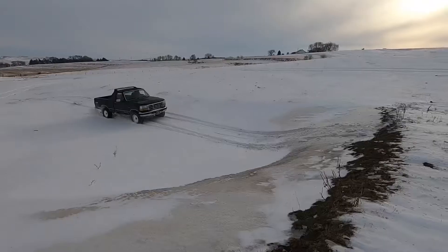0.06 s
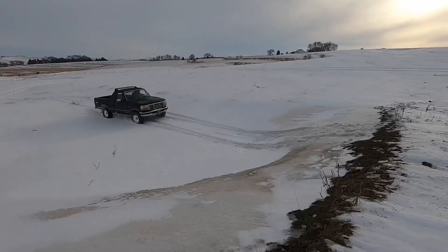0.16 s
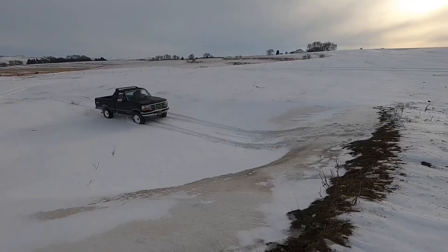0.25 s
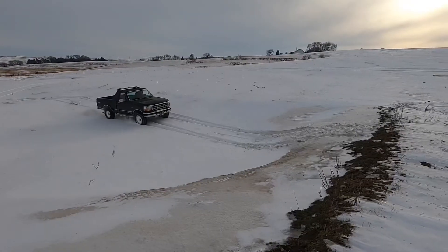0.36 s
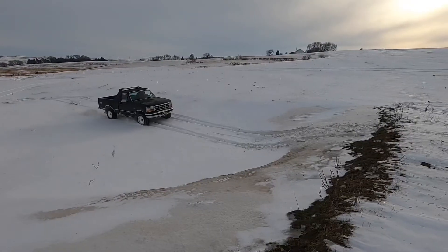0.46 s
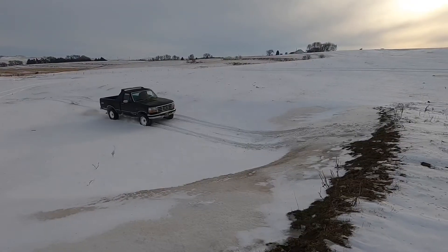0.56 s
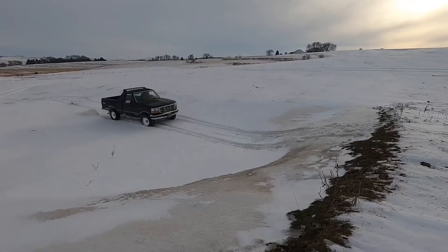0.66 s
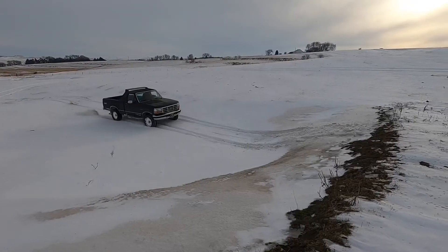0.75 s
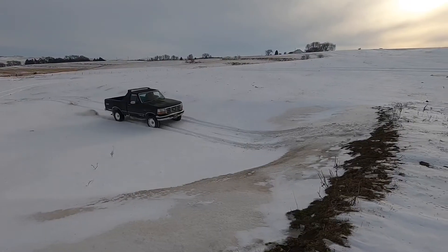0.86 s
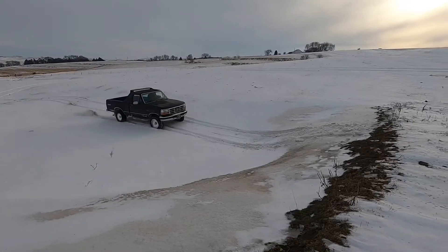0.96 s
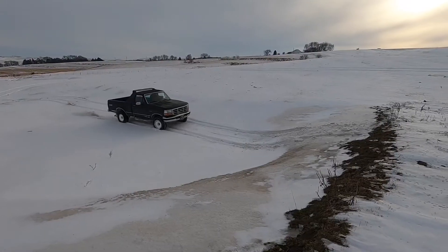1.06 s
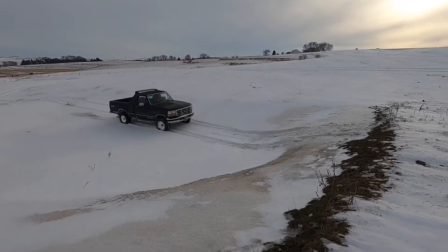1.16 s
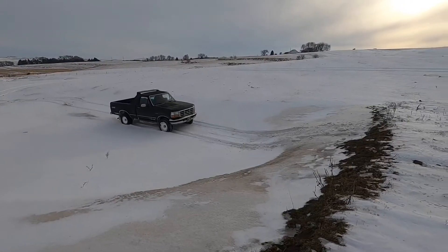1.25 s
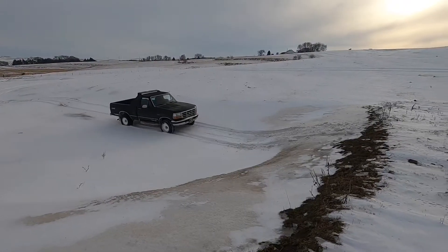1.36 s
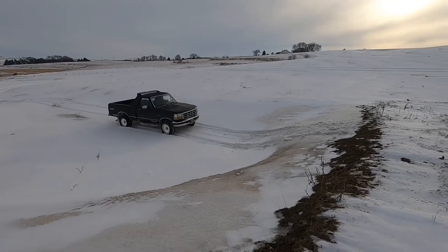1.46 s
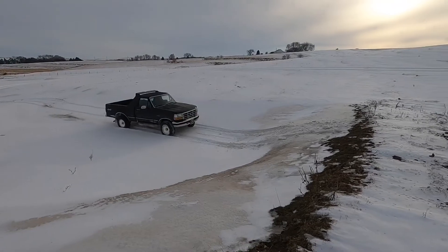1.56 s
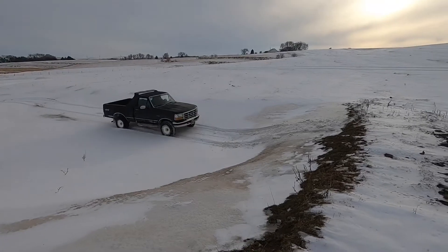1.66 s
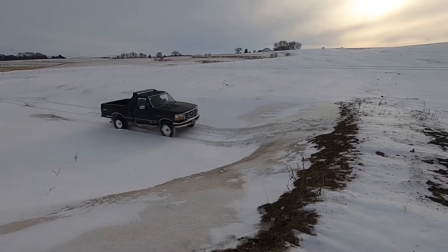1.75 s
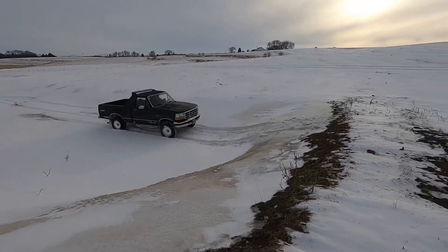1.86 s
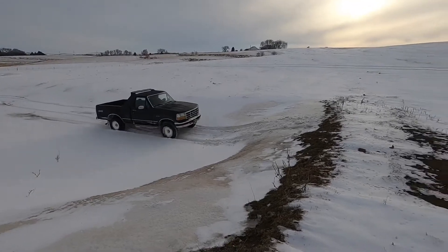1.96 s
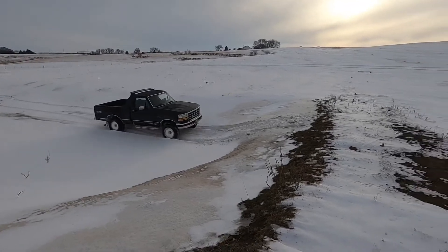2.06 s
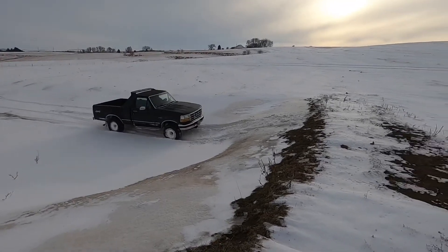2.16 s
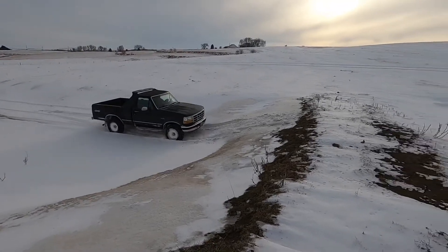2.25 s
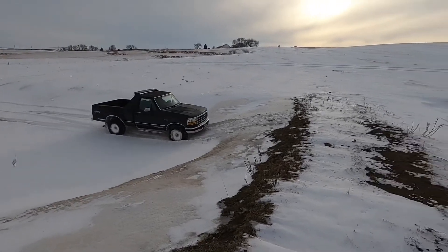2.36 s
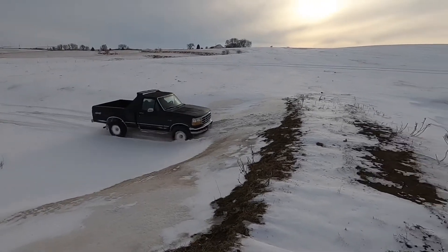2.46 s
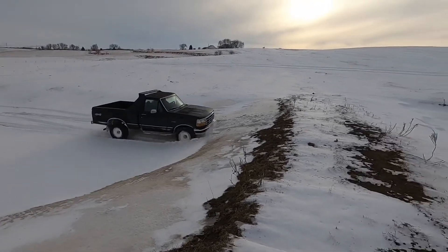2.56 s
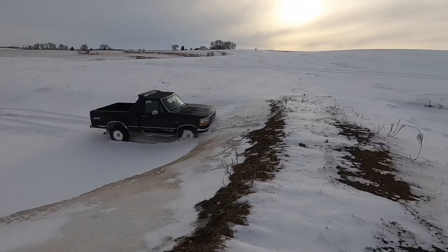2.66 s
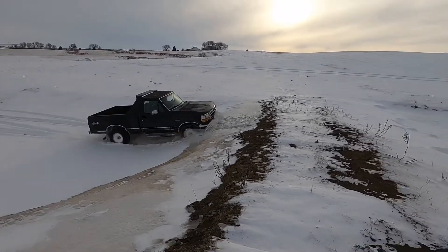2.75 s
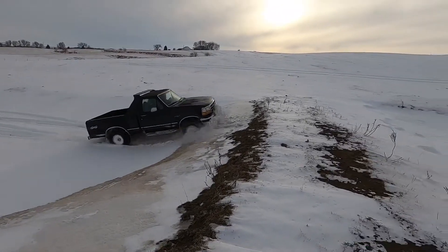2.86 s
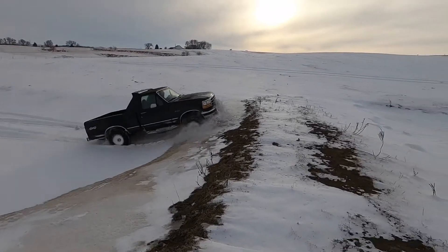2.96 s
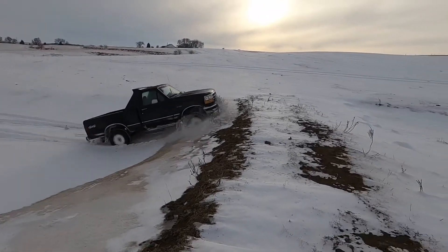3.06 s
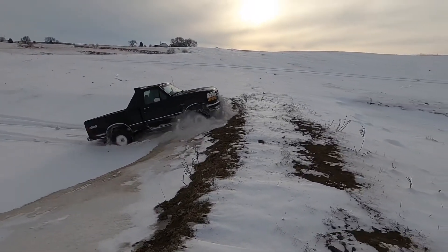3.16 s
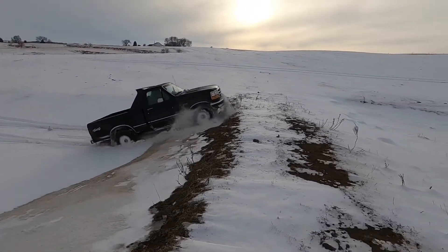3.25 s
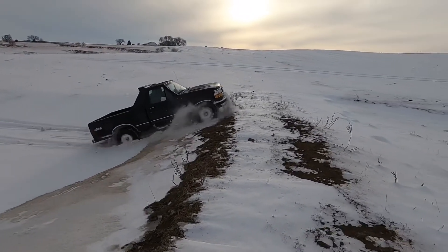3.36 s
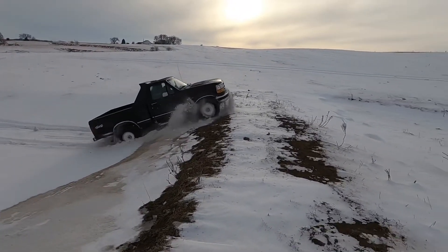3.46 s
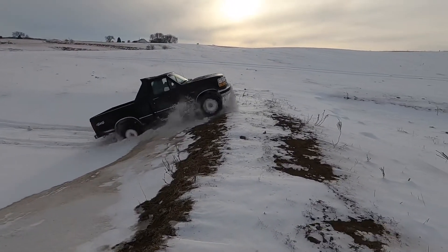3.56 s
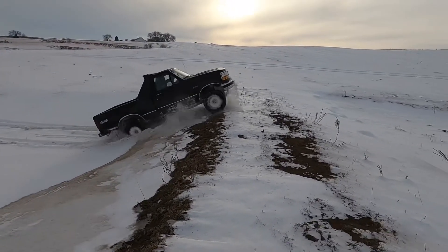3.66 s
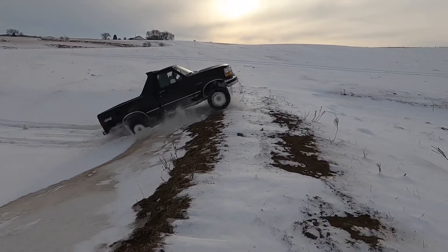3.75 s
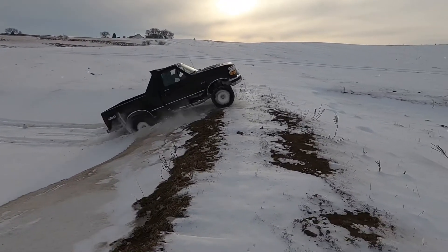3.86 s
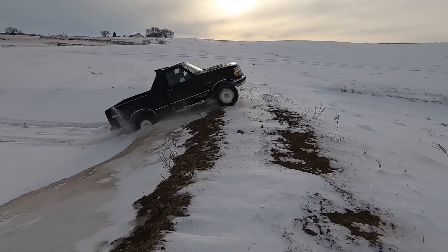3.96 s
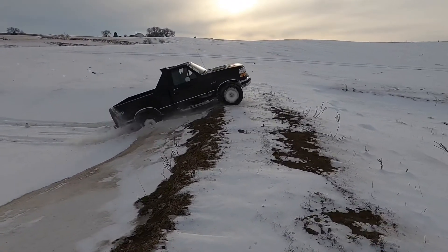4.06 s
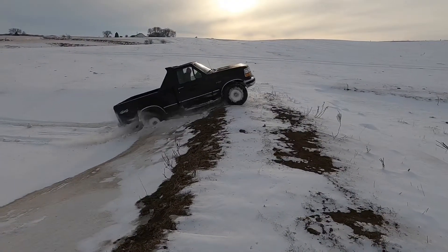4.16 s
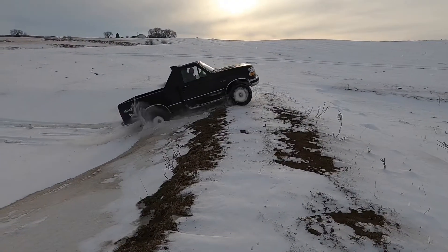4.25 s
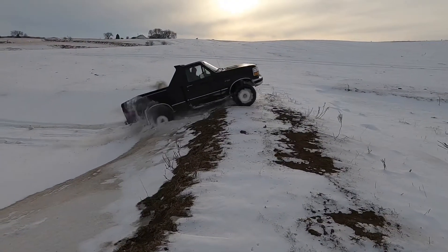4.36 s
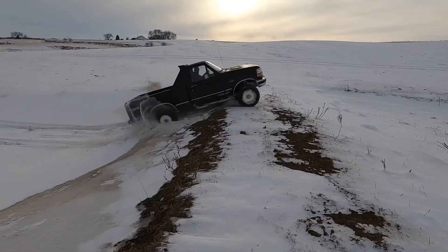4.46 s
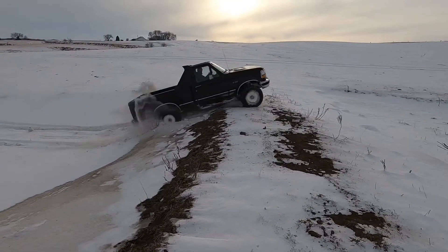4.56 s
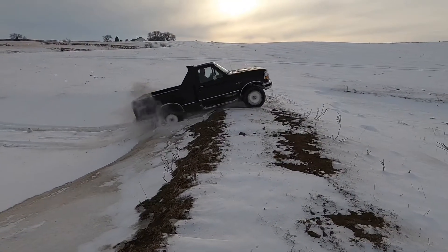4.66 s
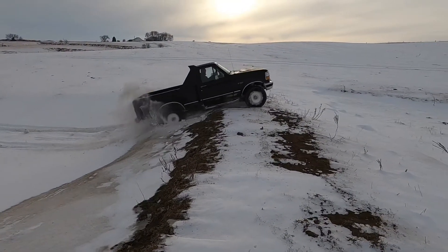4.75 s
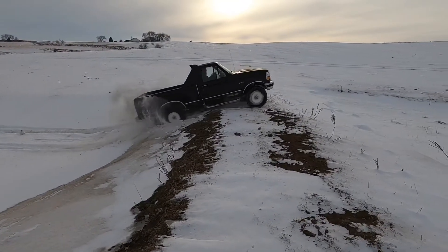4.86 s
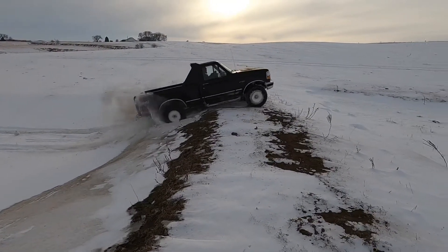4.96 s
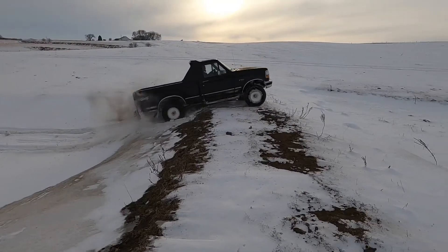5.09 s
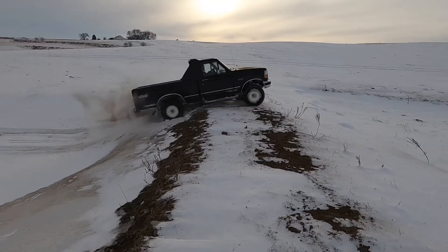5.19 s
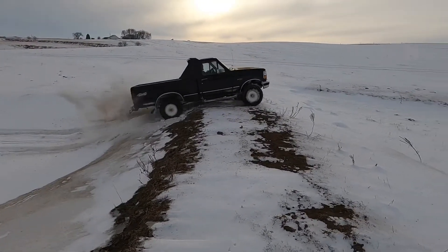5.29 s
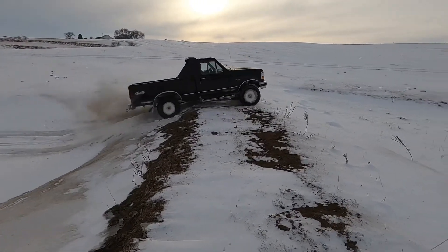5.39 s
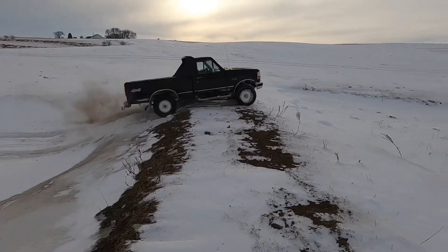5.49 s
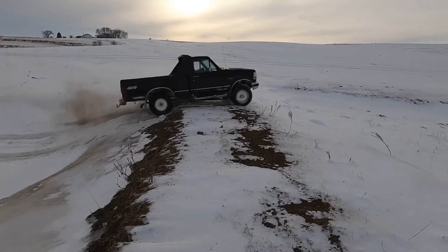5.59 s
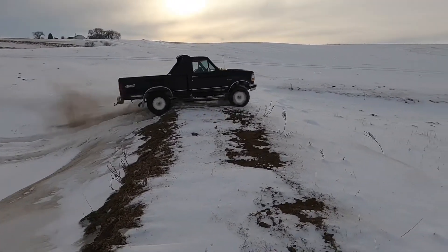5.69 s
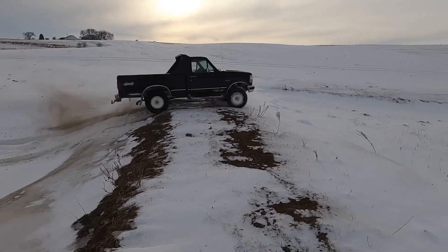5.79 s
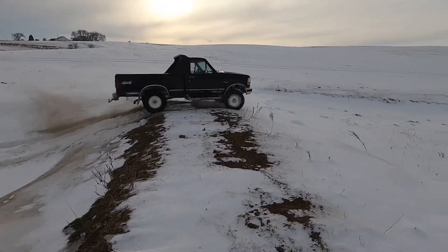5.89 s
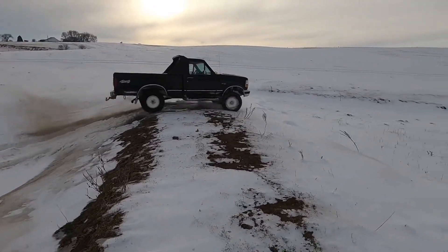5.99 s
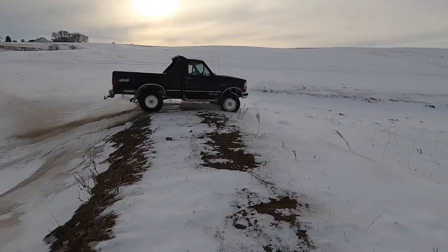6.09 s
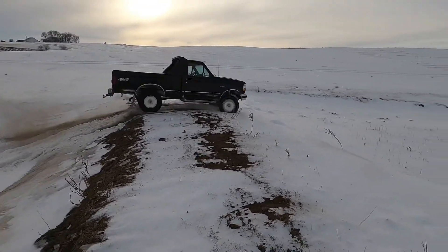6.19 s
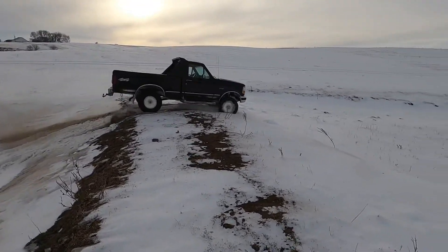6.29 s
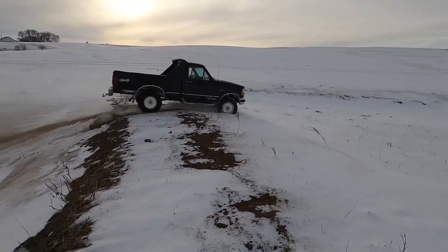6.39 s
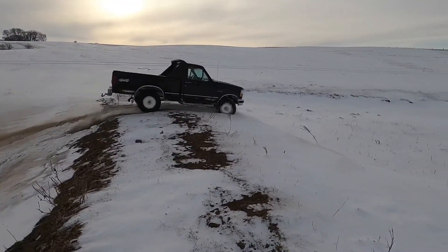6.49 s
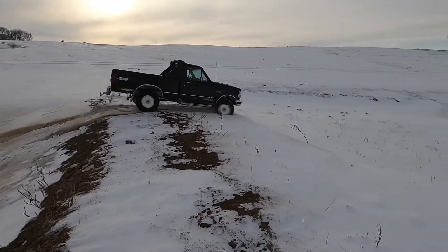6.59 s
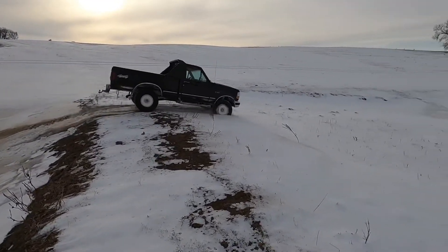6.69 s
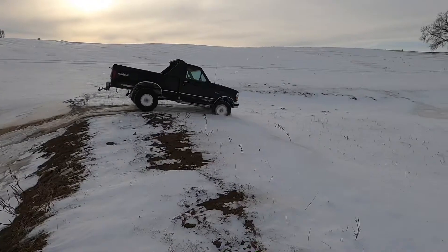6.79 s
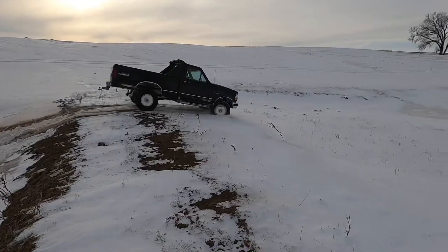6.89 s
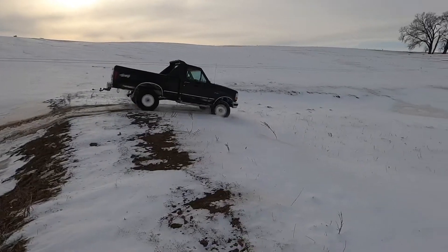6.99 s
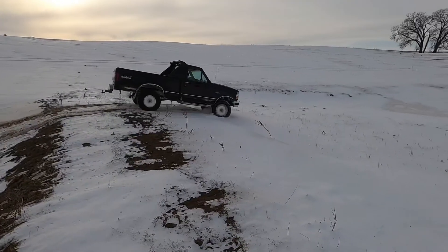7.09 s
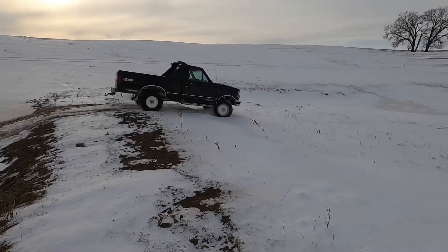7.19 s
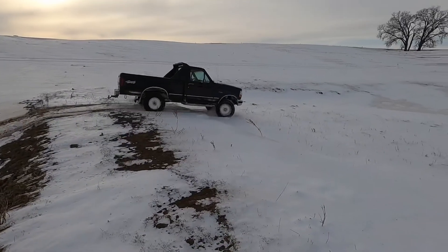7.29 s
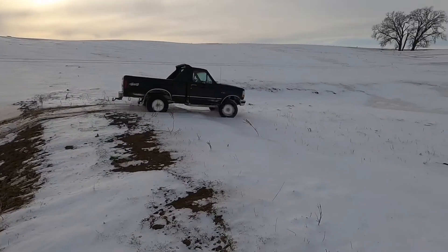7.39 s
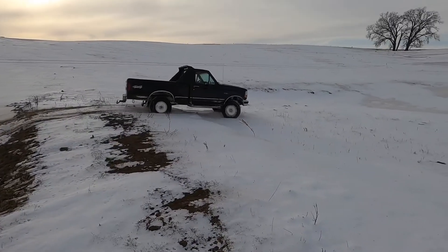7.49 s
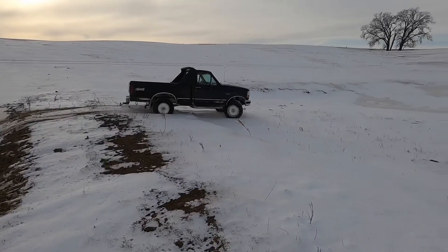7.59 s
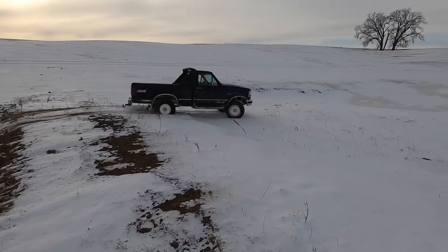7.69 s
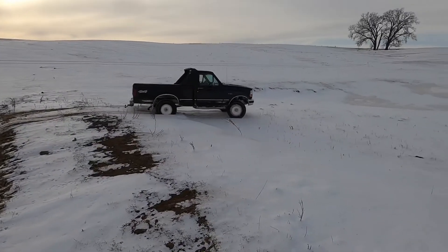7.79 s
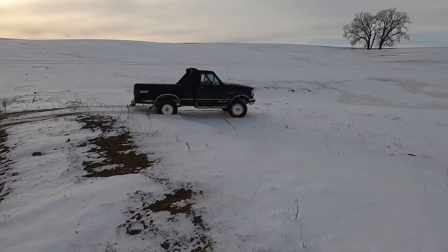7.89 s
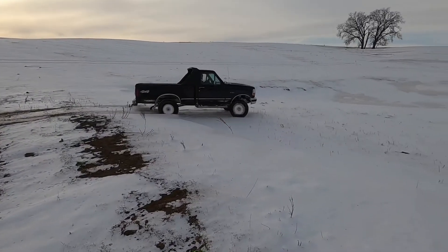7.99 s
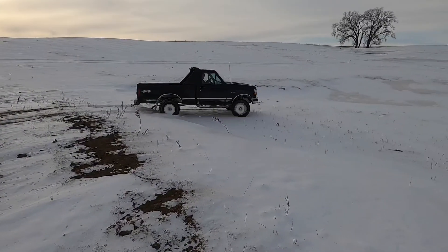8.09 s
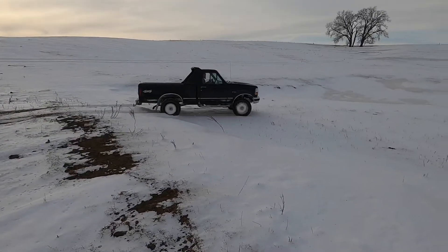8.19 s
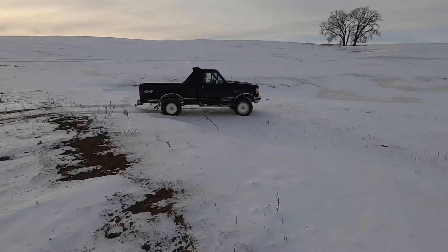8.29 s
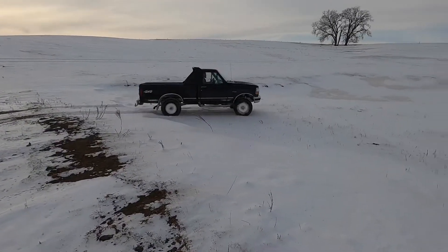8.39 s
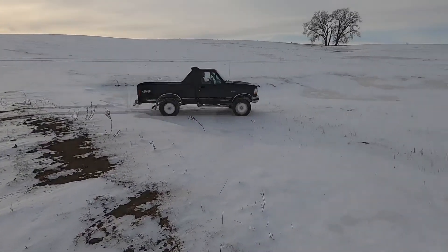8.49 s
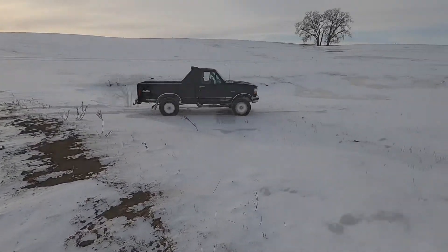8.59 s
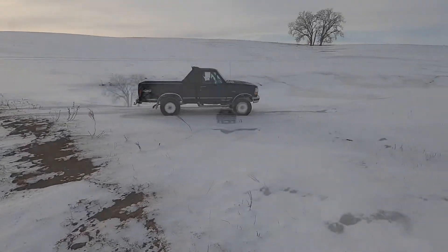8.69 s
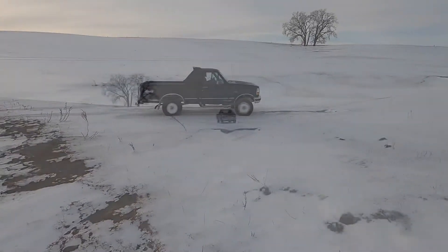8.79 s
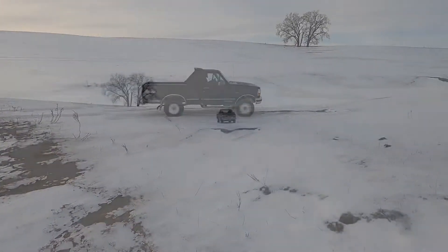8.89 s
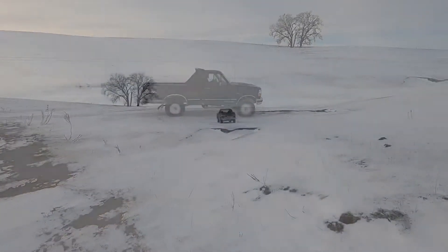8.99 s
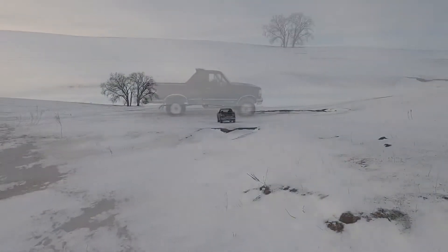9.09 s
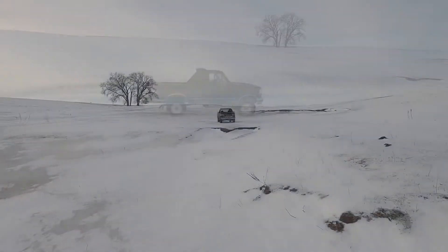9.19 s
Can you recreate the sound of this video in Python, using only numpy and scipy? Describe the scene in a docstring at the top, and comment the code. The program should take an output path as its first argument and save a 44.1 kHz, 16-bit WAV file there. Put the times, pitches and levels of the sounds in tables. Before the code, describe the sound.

A six-cylinder pickup drones across an open, snowy field with a burbling, chuffing exhaust and a few light metal clinks. Light wind rumbles on the mono microphone. At about 1.5 seconds the engine revs and the tyres slip, with a bump just before 2. Around 3 seconds the body hits a frozen bank with a cluster of thuds and clinks. From there to 6 seconds the engine strains loudly in surges, highest around 4, while spinning tyres whine and spray snow and dirt. A falling tyre hum after 5 seconds leads to an axle clack and short icy spurts near 6. By 6.5 seconds the engine sinks to idle, and the microphone takes one hard thump, then two faint ones later. The truck rolls on with soft snow crunching, small clacks and a slight slip around 8, fading a little near 9 seconds.

```python
"""A snowy field: a six-cylinder pickup crosses it, revs up a frozen bank and rolls on at idle.
Throttle, engine speed and load set how its exhaust drones and burbles; a leak chuffs once per cycle.
The body bumps and clinks, and each burst of wheelspin sprays snow and dirt.
Light wind rumbles on a mono microphone, which is bumped once hard and twice faintly."""
import sys
import numpy as np
from scipy import signal
from scipy.fft import rfft, irfft, next_fast_len
from scipy.io import wavfile
from scipy.ndimage import uniform_filter1d, map_coordinates

SR = 44100
rng = np.random.default_rng(int(sys.argv[2]) if len(sys.argv) > 2 else 0)


def to_wav(s):
    """Save 16-bit WAV."""
    ch = np.atleast_2d(s).T  # columns
    pcm = np.round(np.clip(ch, -1, 1) * 32767)  # PCM
    wavfile.write(sys.argv[1], SR, pcm.astype(np.int16))


N = 407484


def amp(db):
    """Turn decibels into a gain."""
    return 10 ** (np.asarray(db) / 20)


def unit(x):
    """Scale to an average strength (rms) of 1."""
    return x / np.sqrt(np.mean(x ** 2) + 1e-20)


def clock():
    """The time of every sample, in seconds."""
    return np.arange(N) / SR


def curves(rows):
    """Join timed rows with straight lines: one curve for each column after the time."""
    times, *columns = np.transpose(rows)
    return [np.interp(clock(), times, column) for column in columns]


def wobble(rate_hz):
    """A smooth random curve with rate_hz new values a second."""
    size = int(N * rate_hz / SR) + 4
    steps = np.arange(size * 10) / 10
    smooth = map_coordinates(rng.standard_normal(size), [steps], mode="nearest")
    return np.interp(clock() * rate_hz, steps, smooth)


def noise():
    """White noise."""
    return rng.standard_normal(N)


def grains(per_second, spread_db):
    """Tiny random impacts of uneven size."""
    return unit((rng.random(N) < per_second / SR) * noise() * amp(spread_db * np.clip(noise(), -2, 2)))


def filtered(x, gain_at):
    """Scale each frequency in x by gain_at(hz)."""
    size = next_fast_len(N + 8192)
    return irfft(rfft(x, size) * gain_at(np.fft.rfftfreq(size, 1 / SR)), size)[:N]


def colour(x, points):
    """Shape the tone of x with (pitch_hz, level_db) points, then scale to strength 1."""
    pitch_hz, level_db = np.transpose(points)
    return unit(filtered(x, lambda hz: amp(
        np.interp(np.log(hz + 1), np.log(pitch_hz), level_db, left=-120, right=-120))))


def strike(start_s, rise_s, decay_s):
    """The loudness of a blow: it rises, and dies away by 60 dB in decay_s."""
    age = np.maximum(clock() - start_s, 0)
    return (1 - np.exp(-age / rise_s)) * amp(np.maximum(-60 * age / decay_s, -200))


def held(start_s, end_s, rise_s, fall_s):
    """Ramp up to 1, hold until end_s, ramp down."""
    t = clock()
    return np.clip(np.minimum((t - start_s) / rise_s, 1 - (t - end_s) / fall_s), 0, 1)


def singing(track, width_hz):
    """A rough tone: a narrow band of noise follows (time_s, pitch_hz, level_db) rows."""
    hz, db = curves(track)
    phase = 2 * np.pi * np.cumsum(hz) / SR
    sounding = (clock() > track[0][0]) & (clock() < track[-1][0])
    return sounding * amp(db) * unit(wobble(width_hz) * np.sin(phase) + wobble(width_hz) * np.cos(phase))


def once_per(turns, sharpness):
    """A smooth peak of height 1 at every whole turn."""
    return np.exp(sharpness * (np.cos(2 * np.pi * turns) - 1))


def resonance(hz, centre_hz, width_hz):
    """How strongly a space rings: 1 at its centre pitch, half at width_hz to either side."""
    return 1 / (1 + ((hz - centre_hz) / width_hz) ** 2)


# Strength of the wind: time_s, level_db
WIND_LEVELS = [(0, -25), (1.1, -34.5), (2, -33), (2.5, -32), (3.25, -26.5), (3.6, -29.5), (6.2, -27),
               (6.9, -44.5), (7.2, -44.5), (7.5, -36), (7.9, -45), (8.5, -39.5), (9.24, -44.5)]
def wind(gust_db=1.5):
    """Gusts push on the microphone and make a low rumble."""
    rumble = colour(noise(), [(14, -30), (27, -13), (40, -15), (60, -12), (90, -14), (160, -17.5)])
    return amp(curves(WIND_LEVELS)[0]) * rumble * amp(gust_db * wobble(8.2))


# Bumps on the microphone: time_s, level_db, pitch_hz, width_s
MIC_THUMPS = [(6.6748, -9, 205, .0028), (7.29, -39, 212, .022), (8.44, -39, 190, .014)]
def mic_thumps(shake_db=-20, knock_db=-30):
    """A bump gives a short low swing and a faint knock of the case, then the mount shakes."""
    out = np.zeros(N)
    mount = colour(noise(), [(70, -8), (118, 11), (165, -12), (230, 12), (300, -12), (380, -34)])
    for time_s, db, hz, width_s in MIC_THUMPS:
        t = clock() - time_s
        blow = 1 / np.cosh(np.clip(t / width_s, -20, 20))
        swing = -np.sin(2 * np.pi * hz * t)
        knock = amp(knock_db) * blow * np.sin(2 * np.pi * 1050 * t)
        shake = amp(shake_db) * mount * strike(time_s, 0.0036, 0.35)
        out += amp(db) * (blow * (swing + knock) + shake)
    return out


# One swish near the end: time_s, level_db, width_s
FAINT_SWISH = (9.120, -57, 0.034)
def swish():
    """Faint, bright noise briefly swells and fades."""
    time_s, db, width_s = FAINT_SWISH
    swell = np.exp(-.5 * ((clock() - time_s) / width_s) ** 2)
    return amp(db) * swell * colour(noise(), [(1500, 6), (3000, 6), (7000, 0), (10000, -9), (15000, -24)])


# Loose metal shaking: start_s, level_db, pitch_hz, decay_s
METAL_CLINKS = [(0.104, -27, 4100, 0.066), (0.242, -31, 3750, 0.072), (1.072, -26, 2750, 0.057),
                (1.383, -26, 2760, 0.057), (2.735, -27, 3380, 0.089), (2.778, -18.5, 2700, 0.063),
                (3.15, -27.5, 6150, 0.043), (3.208, -26, 4700, 0.048), (3.362, -36, 5160, 0.058),
                (6.068, -41, 6800, .1), (6.178, -36, 3930, .13)]
def metal_clinks(rattle=0.45, tick_db=-14):
    """Loose metal ticks, then rings briefly with a buzzing edge."""
    tick = amp(tick_db) * colour(noise(), [(600, -2), (2500, 3), (5000, 0), (12000, -27)])
    buzz = 2 * rattle * wobble(300)
    out = np.zeros(N)
    for start_s, db, hz, decay_s in METAL_CLINKS:
        ring = strike(start_s, 0.007, decay_s) * np.sin(2 * np.pi * hz * clock() + buzz)
        out += amp(db) * (ring + strike(start_s, 0.00065, 0.012) * tick)
    return out


# The rear axle coming down: start_s, level_db, pitch_hz
AXLE_CLACKS = [(5.7525, -22.5, 890), (7.6151, -30.5, 890), (7.664, -35, 810), (8.896, -42, 900)]
def axle_clacks(decay_s=0.02, tick_db=-10):
    """A hard tick of contact, then a short, dry ring from the spring's mount."""
    tick = amp(tick_db) * colour(noise(), [(1200, -17), (2500, 3), (3200, -9), (5000, -14), (10000, -19)])
    out = np.zeros(N)
    for start_s, db, hz in AXLE_CLACKS:
        ring = strike(start_s, 0.00076, decay_s) * np.sin(2 * np.pi * hz * (clock() - start_s))
        out += amp(db) * (ring + strike(start_s - .001, 0.00048, 0.0076) * tick)
    return out


# Body and springs hitting ruts: time_s, level_db, extra_thud_db
BODY_BUMPS = [(1.85, -18, -4), (2.939, -18.5, 5.5), (2.985, -22, 9.5), (3.041, -16, -0.5), (3.089, -41, 16),
              (3.246, -18, 1), (3.264, -19, 5)]
def body_bumps(crash_db=-8, thud_db=-3):
    """The front end slams into the bank: a low thud under a short crash of panels."""
    crash = colour(noise(), [(250, 10), (450, 5.5), (1000, 1.5), (1500, -7.5), (2000, -3),
                             (3500, -16), (8000, -31)])
    thud = colour(noise(), [(25, 4), (42, 2.5), (70, -0.5), (100, -8), (170, -8.5), (350, -18.5)])
    out = np.zeros(N)
    for time_s, db, extra_thud_db in BODY_BUMPS:
        out += amp(db + crash_db) * crash * strike(time_s - .004, 0.0009, 0.16)
        out += amp(db + extra_thud_db + thud_db) * thud * strike(time_s - .004, 0.0079, 0.51)
    return out


def snow_crunch(gain_db=-8):
    """Crusted snow cracks softly under slowly rolling tyres."""
    cracks = grains(70, 1.2) ** 2
    crack_shape = np.hanning(SR // 70)
    bursts = np.sqrt(abs(signal.fftconvolve(cracks, crack_shape)[:N])) * noise()
    return amp(gain_db) * colour(bursts, [(400, -14), (650, -7), (800, -9), (1100, 17), (1600, 9),
                                          (2400, -6), (3500, -20), (6000, -10), (10000, -14), (15000, -41)])


# Spurts of icy snow: start_s, level_db, rise_s, decay_s, grit_share (0 coarse ice, 1 fine grit)
ICE_SPURTS = [(2.689, -31, 0.012, 0.22, 0.63), (4.56, -36, .03, 0.33, .9), (4.72, -32, 0.043, 0.41, 0.74),
              (5.88, -26.5, 0.0017, 0.044, 0.19), (5.932, -30.5, .002, 0.044, 0),
              (5.966, -26.5, 0.0018, 0.046, 0.2), (5.996, -30, .002, 0.086, 0),
              (6.025, -35, .002, 0.046, 0), (6.086, -29, 0.0017, 0.11, 0.26),
              (6.176, -33, .002, 0.11, 0.26)]
def ice_spurts():
    """A tyre bites and flings a sudden handful of ice or grit."""
    ice = colour(grains(6000, 1.6), [(900, -19), (1900, 0), (2550, 12), (3300, 0.5), (4500, -12),
                                     (9000, -14.5), (12000, -40), (15700, -49)])
    grit = colour(grains(1800, 3), [(1200, -15), (2000, 6), (3200, -2), (4900, 2.5), (6600, -9),
                                    (7800, -20), (10000, -19.5), (15700, -39)])
    return sum(amp(db) * strike(start_s, rise_s, decay_s) * (share * grit + (1 - share) * ice)
               for start_s, db, rise_s, decay_s, share in ICE_SPURTS)


# The falling note of the tyre tread: time_s, pitch_hz, level_db
TREAD_NOTE = [(5.098, 266.5, -33.5), (5.299, 237.2, -27.5), (5.49, 185.3, -24), (5.56, 161.5, -30),
              (5.66, 136, -31), (5.76, 115, -52)]
def tread_drumming(overtone_ratio=1.8, overtone_db=-8):
    """Tread blocks drum as the spinning wheels slow down, with a rougher tone above."""
    overtone = [(time_s, overtone_ratio * hz, db + overtone_db) for time_s, hz, db in TREAD_NOTE]
    return singing(TREAD_NOTE, width_hz=50) + singing(overtone, width_hz=150)


# Bursts of wheelspin: start_s, end_s, snow_db, dirt_db, pitch_hz, whine_db, width_hz, glide_hz_per_s
WHEEL_SPINS = [(1.456, 1.993, -39, -53, 2640, -52, 349, 3.5),
               (2.169, 2.22, -60, -60, 1904, -43, 139.7, -300),
               (2.62, 2.853, -40, -36.5, 2730, -48, 152, -10),
               (2.867, 3.083, -37, -32.5, 2773, -40, 210.8, -450),
               (3.112, 3.42, -39.5, -35.5, 2656, -44, 257.6, -150),
               (3.498, 4.013, -37.5, -39, 2390, -44.5, 331, 149),
               (4.001, 4.593, -37.5, -32.5, 2440, -43, 280.5, 218.5),
               (4.547, 5.146, -40.5, -34, 2672, -42.5, 400.7, -300),
               (5.097, 5.384, -41.5, -29, 2530, -44.5, 332.3, -250),
               (5.484, 5.767, -50.5, -36.5, 2430, -58, 352, -2),
               (5.744, 6.084, -41.5, -38.5, 2536, -43.5, 600, -150),
               (7.87, 8.378, -59, -53.5, 2397, -65, 600, -2.5)]
def wheelspin(full_slip=0.37, break_loose_s=0.096, run_down_s=0.29):
    """Slipping tyres sing. Gives the amount of slip, gains for flung snow and dirt, and the whine."""
    slip, snow, dirt, whine = np.zeros((4, N))
    for start_s, end_s, snow_db, dirt_db, hz, whine_db, width_hz, glide in WHEEL_SPINS:
        spin = held(start_s, end_s, break_loose_s, run_down_s)
        slip = np.maximum(slip, full_slip * spin)
        snow = np.maximum(snow, amp(snow_db) * spin)
        dirt = np.maximum(dirt, amp(dirt_db) * spin)
        whine += spin * singing([(start_s, hz, whine_db), (start_s + 1, hz + glide, whine_db)], width_hz)
    return slip, snow, dirt, whine


def snow_squeak(x, depth_db):
    """Crushed snow favours ever-changing narrow bands of pitch for a few hundredths of a second."""
    bands = signal.stft(x, nperseg=1024)[2]
    patches = uniform_filter1d(rng.standard_normal(bands.shape), size=4, axis=0)
    patches = uniform_filter1d(patches, size=3, axis=1)
    return signal.istft(bands * amp(depth_db * unit(patches)), nperseg=1024)[1][:N]


def clatter(cycle, size=4096):
    """Moving parts repeat the same pattern of noise with every engine cycle."""
    return unit(np.interp(cycle % 1, np.arange(size) / size, rng.standard_normal(size)))


# The side of the truck we hear: time_s, view (0 front, 1 side, 2 behind)
TRUCK_VIEW = [(0, 0.0068), (2.5, 0.093), (3.3, 0.6), (5.4, 1.28), (6.2, 1.7), (6.5, 2.095), (9.24, 2)]
def turning(x, tones):
    """Blend the front, side and rear tone of a sound as the truck passes."""
    view, = curves(TRUCK_VIEW)
    return sum(np.clip(1 - abs(view - i), 0, 1) * colour(x, tone) for i, tone in enumerate(tones))


# Tone of the hiss from the front, side and rear: pitch_hz, level_db
FRONT_HISS = [(880, -39), (1500, -12), (1840, 4.5), (2520, -3), (2810, -1), (3350, -9), (3620, -7.5),
              (4720, -10), (5210, -17), (5860, -14), (7270, -23), (8850, -21.5), (11100, -34),
              (12500, -33.5), (15600, -45)]
SIDE_HISS = [(900, -26), (1450, -11), (1720, 0.5), (2150, -3.5), (2500, -2), (3000, -4), (3700, -9.5),
             (4700, -11), (6700, -19), (7600, -24.5), (9000, -19), (11100, -37.5), (12400, -33),
             (15600, -45)]
REAR_HISS = [(850, -28), (1450, -10), (1650, 4.5), (2070, -4.5), (2360, 4), (2820, -5.5), (3410, -6),
             (3730, -12), (4080, -8), (5950, -12.5), (7190, -18), (8600, -19), (10800, -30), (13100, -43),
             (15600, -44)]
def hiss(cycle, leak, slip, valves=0.76, spray=0.61, chuff=1.2):
    """Fan and valve noise, snow grains flung by the tyres, and the leak's chuff once a cycle."""
    snow = spray * (slip + 0.27) * grains(3000, 3.9) * amp(0.61 * wobble(25))
    mix = noise() + valves * (1 - slip) * clatter(cycle) + snow
    mix /= np.sqrt(1 + (spray * (slip + 0.33)) ** 2)  # make room for the snow
    puff = colour(noise(), [(1500, -19), (2500, 2.5), (4000, 1), (9000, 4.5), (15700, -2)])
    puff *= chuff * (1 - slip / 2) * leak * once_per(cycle, 2.6) * amp(2 * wobble(18))
    return turning(snow_squeak(mix + puff, depth_db=2), [FRONT_HISS, SIDE_HISS, REAR_HISS])


# Tone of the roar from the front, side and rear: pitch_hz, level_db
FRONT_ROAR = [(180, -17), (300, 0), (328, -7), (387, 1), (520, -3.5), (675, 2), (876, -5), (978, -0.5),
              (1310, -5), (1460, -17), (1550, -41), (2020, -51), (3410, -120)]
SIDE_ROAR = [(200, -21), (300, 3.5), (380, -4.5), (500, -9.5), (670, -1.5), (850, -5.5), (1040, -6),
             (1260, -11), (1460, -25), (1600, -43), (2100, -49)]
REAR_ROAR = [(180, -42), (300, -11), (376, -5.5), (441, -3), (506, -5), (652, -1.5), (835, -8.5),
             (1080, -5.5), (1170, -14), (1550, -16), (2020, -49), (3410, -120)]
def engine_roar(cycle, load, throb=0.69, dirt=0.3):
    """Engine bay noise throbs with each firing; under load, clods are thrown against the body."""
    air = unit(noise() * (1 + throb * once_per(cycle * len(CYLINDER_STRENGTHS), 1.4)))
    parts = 1.15 * (1 - 0.7 * load) * clatter(cycle)
    clods = dirt * load * grains(350, 4.1)
    return turning(unit(air + parts + clods), [FRONT_ROAR, SIDE_ROAR, REAR_ROAR])


# The pulse of each cylinder, in firing order: strength
CYLINDER_STRENGTHS = [1.34, 0.7, 1.63, 0.68, 1.3, 1.05]
# Tone of the exhaust pipe: pitch_hz, level_db
PIPE_TONE = [(30, -27), (60, -24.5), (100, -7.5), (130, -8.5), (160, -3.5), (205, 0), (255, -4),
             (320, -13.5), (420, -28), (700, -47)]
def exhaust_burble(cycle, idle, scatter=0.46, jitter_s=0.00054, steady_share=.7, gas=0.7, idle_db=-6):
    """One ragged pulse per firing rings the pipe; at idle mostly soft, swirling gas is left."""
    cylinders = len(CYLINDER_STRENGTHS)
    count = np.floor(cycle * cylinders).astype(int)
    fires_at = np.flatnonzero(np.diff(count))
    size_luck, time_luck = rng.standard_normal((len(fires_at), 2)).T
    size = np.take(CYLINDER_STRENGTHS, count[fires_at] % cylinders) * (1 + scatter * size_luck)
    size *= np.sqrt(np.gradient(fires_at))  # slower firings are bigger
    size -= steady_share * uniform_filter1d(size, 6)  # the even part is heard as the drone instead
    fires_at = np.clip(fires_at + (jitter_s * SR * time_luck).astype(int), 0, N - 1)
    pulses = unit(np.bincount(fires_at, size, N))
    flow = (1 - 0.9 * idle) * pulses + gas * (1 + idle) * noise()
    return amp(idle_db * idle) * colour(flow, PIPE_TONE)


# The tones in the drone: order (waves per engine cycle), light_load_db, full_load_db, idle_db,
# racing_extra_db
ENGINE_TONES = [(3, -15, -16, -11, 5), (4, -26, -22, -18, 3), (5, -11, -9, -20, 10.5),
                (6, 1.5, 1.5, -1, -2), (7, -19, -13, -14, 0), (8, -27, -16, -17, 10), (9, -34, -9, -7, 2),
                (10, -30, -9, -15, 1), (11, -32, -10, -11, 0), (12, -16, -11, 2, -8), (15, -28, -28, -5, 0),
                (18, -26, -26, -9, 0), (20, -28, -38, -26, 0), (21, -33, -28, -13, 0),
                (24, -29, -31, -13, 0), (25, -29, -34, -28, 0), (30, -31, -30, -28, 0),
                (38, -34, -32, -36, 0), (45, -34, -33, -36, 0), (51, -33, -33, -36, 0)]
# Where the pipe rings: pitch_hz, width_hz, even_db (multiples of the firing rate), uneven_db (the rest)
PIPE_RESONANCES = [(64, 4, -6, -5), (222, 14, 1.5, -5)]
# Where the engine bay rings: pitch_hz, width_hz, boost_db
BAY_RESONANCES = [(390.5, 20, 7.3), (481, 14, 4.7), (720, 62, 3.3), (946, 18, 8.7)]
def engine_drone(cycle, firing_hz, load, idle, tone_db, pipe_db, roar_db, drift=0.062):
    """Firings hum as a stack of wavering tones; each blares where the pipe or engine bay rings."""
    out = np.zeros(N)
    cylinders = len(CYLINDER_STRENGTHS)
    racing = load * np.interp(firing_hz, (120, 138), (0, 1))  # fast and strained, it fires unevenly
    unrest = 0.64 + 0.36 * np.maximum(load, idle / 2)
    for order, light_db, full_db, idle_db, racing_db in ENGINE_TONES:
        order = round(order)
        hz = order * firing_hz / cylinders
        db = (1 - idle) * (light_db + (full_db - light_db) * load) + idle * idle_db + racing_db * racing
        bay_db = sum(boost * resonance(hz, centre, width) for centre, width, boost in BAY_RESONANCES)
        db += tone_db if order < 18 else roar_db + 11 + bay_db  # high tones come from the engine bay
        ring = sum(amp(uneven_db if order % cylinders else even_db) * resonance(hz, centre, width)
                   for centre, width, even_db, uneven_db in PIPE_RESONANCES)
        blare = load * (1 - idle) * amp(pipe_db) * ring
        if order == cylinders:  # the main firing tone turns ragged under load
            waver_db = (0.5 + 2.7 * (load + idle)) * wobble(19)
            stray = load
        else:  # the others come and go, and high ones stray most
            waver_db = 3 * unrest * wobble(19) + 2.5 * wobble(5)
            stray = unrest * np.sqrt(order / cylinders)
        turns = order * cycle + drift * stray * wobble(14) + rng.random()
        out += np.hypot(amp(db), blare) * amp(waver_db) * np.sin(2 * np.pi * turns)
    return np.sqrt(2) * amp(-0.5) * out


# How loud the pipe is: base_db, full_throttle_db, speed_doubling_db, full_load_db
PIPE_LOUDNESS = (-43, 1, 3, 16)
# How loud the other layers are: base_db, full_throttle_db, speed_doubling_db, quarter_turn_away_db
DRONE_LOUDNESS = (-31, 12, 4, -4.5)
ROAR_LOUDNESS = (-39, 3, 6.5, -4)
HISS_LOUDNESS = (-41.5, 0.5, 4.5, -6)
def engine_levels(throttle, firing_hz, load, view, cruise_hz=100, fade_start_s=8.62, fade_db_per_s=12):
    """Pipe, drone, roar and hiss levels in dB: they rise with throttle and speed and fade at the end."""
    doublings = np.log2(firing_hz / cruise_hz)
    fade_db = fade_db_per_s * np.maximum(clock() - fade_start_s, 0)
    layers = [(PIPE_LOUDNESS, load), (DRONE_LOUDNESS, view), (ROAR_LOUDNESS, view), (HISS_LOUDNESS, view)]
    return [base_db + throttle_db * throttle + speed_db * doublings + control_db * control - fade_db
            for (base_db, throttle_db, speed_db, control_db), control in layers]


# Engine speed: time_s, firing_hz
ENGINE_SPEED = [(0, 103), (.25, 113), (.5, 113), (.66, 106), (.85, 100), (1.55, 91.5), (1.75, 104),
                (1.97, 120), (2.25, 122), (2.45, 110), (2.75, 94), (2.98, 96), (3.3, 115), (3.58, 103),
                (3.78, 127), (3.95, 143), (4.14, 143), (4.35, 127), (4.62, 139), (5, 124), (5.35, 119),
                (5.52, 102), (5.72, 85), (5.9, 93), (6.08, 100), (6.25, 100), (6.42, 76), (6.62, 48),
                (7.2, 41), (7.9, 43), (8.12, 45.6), (8.3, 42.4), (8.93, 46.5), (9.08, 38)]
# Presses of the accelerator: down_s, up_s, depth (0 to 1)
PEDAL_PRESSES = [(-.1, 0.065, 0.5), (0.563, 1.516, 0.38), (1.5, 1.927, 0.95), (2.32, 2.573, 0.59),
                 (2.7, 3.05, 0.25), (3.076, 3.396, 0.83), (3.59, 4.31, 0.77), (4.43, 4.684, 0.76),
                 (4.7, 5.418, 0.7), (5.585, 6.2, 0.66), (7.887, 8.3, 0.36), (8.25, 8.8, 0.5)]
# Strain of the climb: time_s, load (0 to 1)
ENGINE_LOAD = [(0, 0.02), (1.72, 0), (1.9, 0.45), (2.25, 0.1), (2.7, 0.78), (3.05, 0.84), (3.8, 0.76),
               (5, 0.93), (5.45, 0.96), (5.7, 0.85), (6.24, 0.94), (6.55, 0.26)]
def driving(flywheel_s=.13, open_s=0.11, close_s=0.3):
    """Firing rate, throttle and load; the engine's spinning weight smooths each change of speed."""
    firing_hz = uniform_filter1d(curves(ENGINE_SPEED)[0], int(flywheel_s * SR))
    presses = [depth * held(down_s, up_s, open_s, close_s) for down_s, up_s, depth in PEDAL_PRESSES]
    return firing_hz, np.max(presses, axis=0), np.clip(curves(ENGINE_LOAD)[0], 0, 1)


def scene():
    """Mix engine, tyres, body and wind into two identical channels."""
    firing_hz, throttle, load = driving()
    cycle = np.cumsum(firing_hz) / SR / len(CYLINDER_STRENGTHS)  # engine cycles so far
    idle = np.clip((72 - firing_hz) / 22, 0, 1)  # 1 at 50 firings a second or fewer
    view, = curves(TRUCK_VIEW)
    pipe_db, tone_db, roar_db, hiss_db = engine_levels(throttle, firing_hz, load, view)
    leak = np.clip((1.27 - view) / 0.14, .1, 1)  # the body hides the leak once the truck has passed
    slip, snow, dirt, whine = wheelspin()
    engine = engine_drone(cycle, firing_hz, load, idle, tone_db, pipe_db, roar_db)
    engine += amp(pipe_db - 1) * exhaust_burble(cycle, idle)
    rush = np.hypot(amp(roar_db), dirt) * engine_roar(cycle, load)  # flung dirt swells the roar
    rush += np.hypot(amp(hiss_db), snow) * hiss(cycle, leak, slip)  # flung snow swells the hiss
    tyres = whine + amp(hiss_db) * idle * snow_crunch() + tread_drumming() + ice_spurts()
    body = body_bumps() + metal_clinks() + axle_clacks()
    mono = engine + rush + tyres + body + wind() + mic_thumps() + swish()
    return np.array([mono, mono])


def record(dry, top_hz=15750):
    """Cut away the very highest treble."""
    return np.array([filtered(channel, lambda hz: hz < top_hz) for channel in dry])


dry = scene()
out = record(dry)
to_wav(out)
```